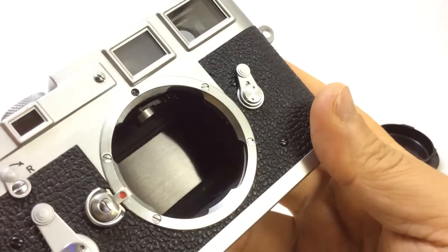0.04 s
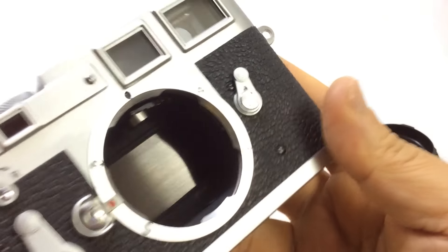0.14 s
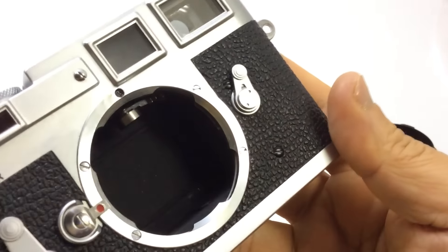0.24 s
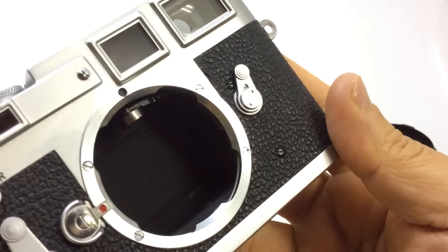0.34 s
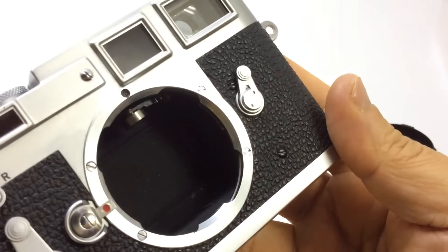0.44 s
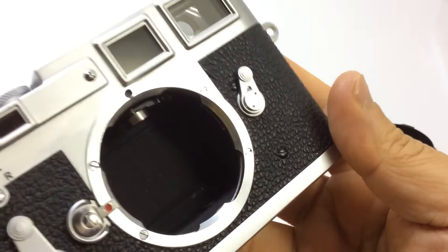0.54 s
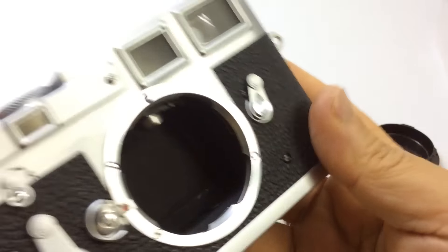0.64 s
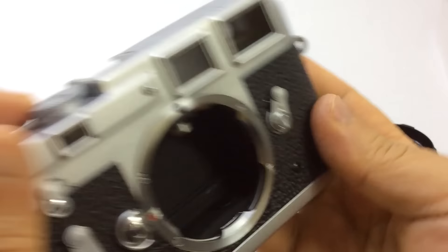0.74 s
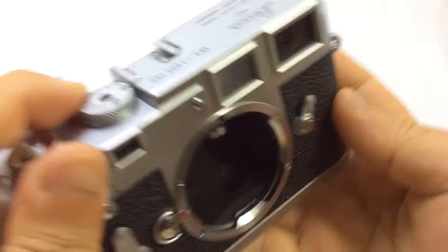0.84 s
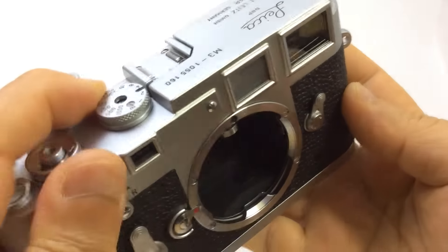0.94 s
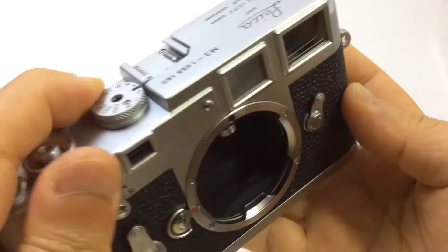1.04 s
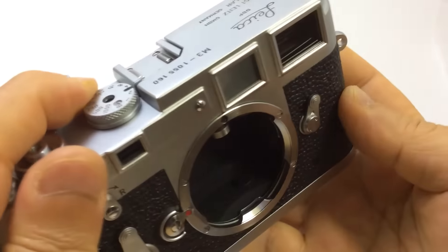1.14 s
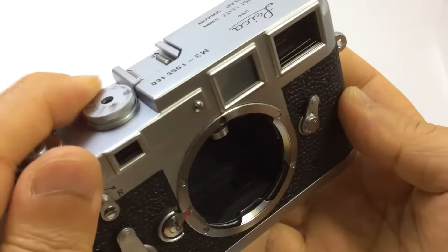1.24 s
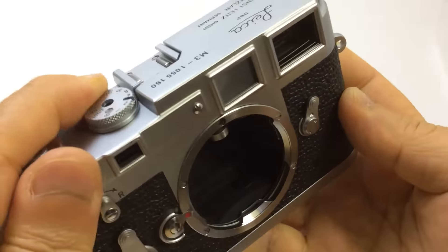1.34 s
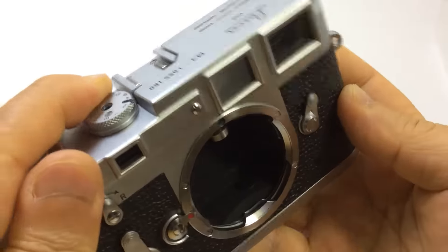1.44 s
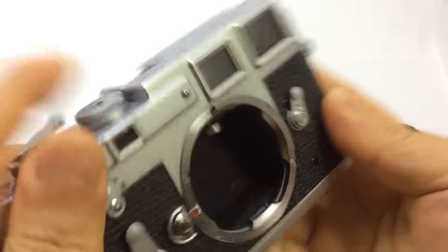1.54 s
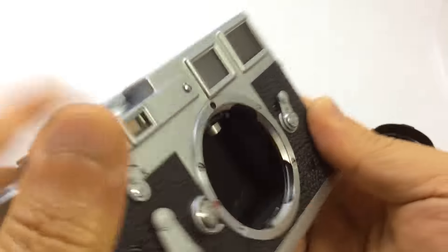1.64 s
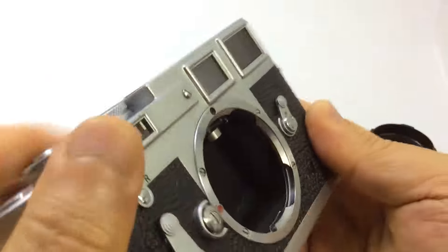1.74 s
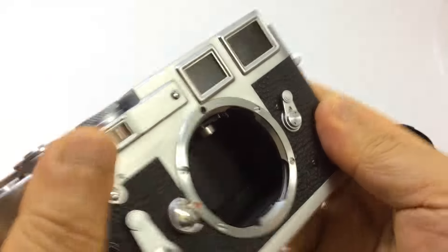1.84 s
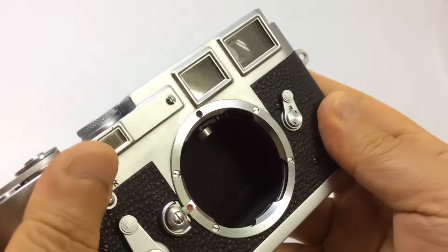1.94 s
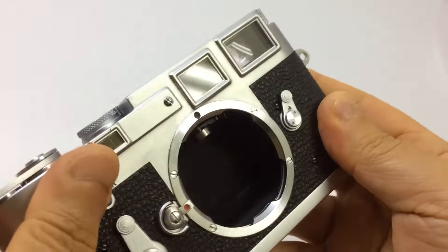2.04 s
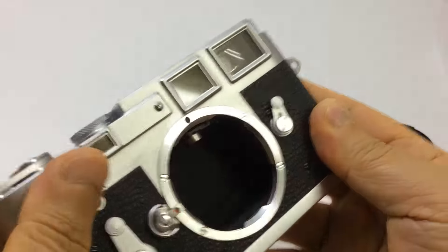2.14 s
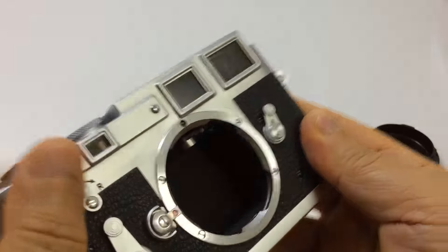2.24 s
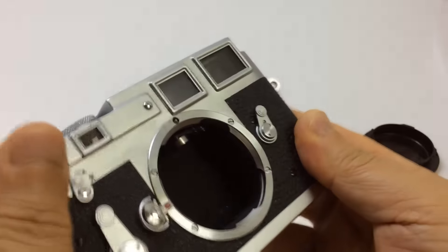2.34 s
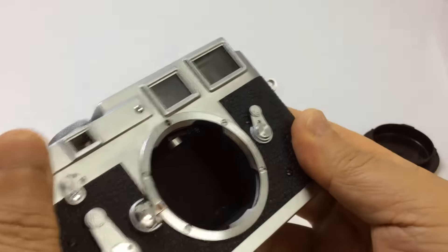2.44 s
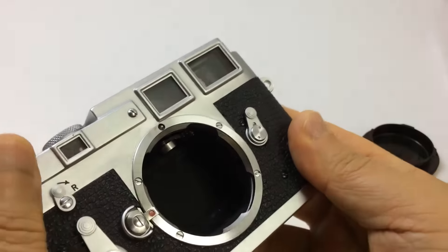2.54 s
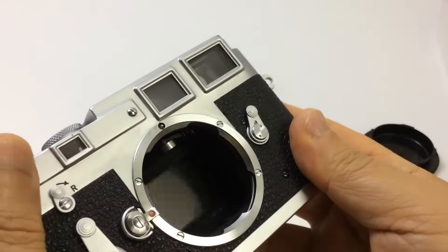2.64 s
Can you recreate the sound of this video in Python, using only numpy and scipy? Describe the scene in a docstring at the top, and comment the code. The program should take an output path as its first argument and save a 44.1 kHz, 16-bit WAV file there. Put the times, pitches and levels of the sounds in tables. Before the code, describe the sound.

Close by in a quiet, faintly humming workshop, a film camera's shutter gives a short buzz and a sharp snap. Faint rapid ticking and soft handling follow, then the winding lever clicks round, catches and springs back.

```python
"""A mechanical film camera, worked by hand, close by in a quiet workshop.
The slow-speed gear train whirrs until the shutter curtain snaps shut (0.24 s); the escapement runs
back, ticking faintly (0.4-0.9 s). Fingers shift. The advance lever is wound until it latches (2.1 s),
then ratchets home against its stop (2.4 s). Impacts are noise bursts shaped by each part's resonances.
Mains hum, a low drone and room air lie underneath throughout."""
import sys
import numpy as np
from scipy import signal
from scipy.fft import rfft, irfft, next_fast_len
from scipy.io import wavfile

SR = 44100
rng = np.random.default_rng(int(sys.argv[2]) if len(sys.argv) > 2 else 0)


def digitize_waveform(pressure):
    """Quantize a signal to 16-bit integers and store it at the path in sys.argv[1].

    Rows of a 2-D input are taken as channels; values are limited to [-1, 1].
    """
    field = np.atleast_2d(pressure).T
    bounded = np.clip(field, -1, 1)
    quanta = np.round(bounded * 32767).astype(np.int16)
    wavfile.write(sys.argv[1], SR, quanta)


N = 116865
T = np.arange(N) / SR


def shutter():
    """The curtain mechanism clicks, then snaps shut; the body rings."""
    # (time [s], 5 band levels [dB], t60 [s], room send [dB])
    hits = [ (.0920, -46.5, -38.5, -47, -43.5, -62, 0.025, -11),
            (.2155, -41.5, -40.5, -31, -26.5, -35, 0.02, -4.5),
            (.2255, -51, -44.5, -42, -37, -47, 0.031, -9),
            (.2379, -25.5, -34, -29, -16, -32.5, 0.059, -8.5),
            (.2391, -22, -18, -12, -13, -16.5, 0.031, -8), (.2420, -23, -13, -16.5, -16, -22.5, 0.018, -15)]
    # Body peaks and dips: (centre [Hz], width [Hz], gain [dB])
    peaks = [(544, 82, 8.5), (1096, 130, 4), (1673, 93, 14), (2030, 160, 6.5), (2681, 91, 4.5),
             (3070, 170, 6), (3720, 180, 8), (4200, 460, -6.5), (6250, 170, 7), (6820, 530, -7.5),
             (7700, 450, 2.5), (9030, 266, -0.5), (10670, 860, 9.5), (11830, 370, -9), (13300, 550, -10)]
    # Mode clusters: (centre [Hz], width [Hz], relative level [dB], t60 [s])
    rings = [(1666, 38, -32, .32)]
    return contacts(hits, peaks, rings)


def winding():
    """The advance lever clicks through its stroke and latches."""
    # (time [s], 5 band levels [dB], t60 [s], room send [dB])
    hits = [ (1.821, -48, -46, -41, -52, -65, 0.069, -30), (1.8328, -51, -56, -39.5, -39, -64, 0.033, -3),
            (1.8482, -39, -35.5, -28, -33, -36, 0.05, -9), (1.868, -42, -33, -32.5, -67, -51, 0.013, -7),
            (1.8725, -47, -41, -35, -43, -59, 0.038, -14), (1.891, -46, -44, -38, -72, -55, 0.049, 6),
            (1.9442, -50, -41, -32.5, -24, -34, 0.047, -9), (2.062, -55, -34.5, -44, -63, -62, .02, -5.5),
            (2.085, -57, -28.5, -27, -28, -55, 0.042, -1),
            (2.090, -47.5, -31, -26.5, -17.5, -30, 0.017, -2.5),
            (2.1068, -28.5, -19.5, -19.5, -18, -23, 0.049, -10.5)]
    # Winder peaks and dips: (centre [Hz], width [Hz], gain [dB])
    peaks = [(219, 190, -19), (388, 57, 4), (685, 52, 16.5), (885, 150, -19), (1950, 460, 6),
             (3180, 940, 4.5), (4900, 240, 4.5), (8030, 170, 5), (9300, 380, 5.5), (10400, 1050, 3),
             (12900, 520, -5)]
    # Mode clusters: (centre [Hz], width [Hz], relative level [dB], t60 [s])
    rings = [(701, 1.2, -12.5, 0.13), (3830, 180, -27, 0.28)]
    return contacts(hits, peaks, rings)


def lever_stop():
    """The returning lever strikes its stop and rings."""
    # (time [s], 5 band levels [dB], t60 [s], room send [dB])
    hits = [ (2.359, -46, -48, -48, -40, -50, 0.19, -9),
            (2.3663, -50.5, -25.5, -23.5, -28.5, -34, 0.03, -11)]
    # Lever peaks and dips: (centre [Hz], width [Hz], gain [dB])
    peaks = [(1320, 320, 8), (1750, 180, -7), (2190, 150, 8), (2600, 260, 5), (3770, 380, 14),
             (9100, 700, 4)]
    # Mode clusters: (centre [Hz], width [Hz], relative level [dB], t60 [s])
    rings = [(3830, 240, -20, 0.28)]
    return contacts(hits, peaks, rings)


def slow_speed_train():
    """Gears whirr while the shutter is open; the escapement then ticks back to rest."""
    # (time [s], level [dB])
    whirr_levels = [(0, -36.5), (.025, -45), (.06, -47), (.17, -46.5), (.235, -43.5), (.245, -84)]
    # Escapement: (time [s], tick rate [1/s], level [dB])
    run_back = [(.378, 97, -56.5), (.728, 92, -58), (0.741, 83, -56), (.918, 78.5, -58.5)]
    # Gear resonances: (centre [Hz], width [Hz], gain [dB])
    peaks = [(2560, 160, 10.5), (3470, 70, 5), (3590, 290, 6), (8150, 280, 6), (10450, 120, 3.5)]
    # Gear spectrum: (frequency [Hz], gain [dB])
    colour = [(300, -20.5), (700, -7), (1200, -8.5), (1900, -3), (3300, -0.5), (4600, -1.5), (5800, 2),
              (6700, -2.5), (8500, 1), (11000, 1), (13000, -6.5), (15000, -6)]
    s, ticks_per_s, db = np.transpose(run_back)
    times = [s[0]]
    while times[-1] < s[-1] - 1 / ticks_per_s[-1]:
        times.append(times[-1] + 1 / np.interp(times[-1], s, ticks_per_s))
    # Light ticks excite the resonances less.
    milder = [(hz, width_hz, .8 * gain_db) for hz, width_hz, gain_db in peaks]
    ticks = body(teeth(times, np.interp(times, s, db), t60_s=.04), milder)
    whirr = body(gear_run(whirr_levels, teeth_per_s=400, t60_s=.012), peaks)
    return coloured(whirr + ticks, colour)


def advance_gears():
    """Gears mesh on the forward stroke; the pawl slips over the teeth on the way back."""
    # (time [s], level [dB])
    stroke_levels = [(1.815, -64.5), (1.84, -63), (1.92, -49.5), (2.0, -50.5), (2.05, -57.5), (2.085, -45)]
    # (time [s], level [dB])
    pawl_clicks = [(2.256, -50.5), (2.267, -53), (2.279, -57), (2.2891, -51.5), (2.297, -49), (2.309, -67),
                   (2.324, -53), (2.335, -58), (2.346, -56)]
    # Gear and pawl spectrum: (frequency [Hz], gain [dB])
    colour = [(500, -8), (1500, 2.5), (3700, 9.5), (5200, 4.5), (9500, 5), (15000, -10.5)]
    ratchet = teeth(*np.transpose(pawl_clicks), t60_s=.053)
    stroke = gear_run(stroke_levels, teeth_per_s=79, t60_s=.018)
    return coloured(ratchet + stroke, colour)


def fingers():
    """Fingers knock lightly on the held body."""
    # (time [s], 5 band levels [dB], t60 [s], room send [dB])
    hits = [ (.957, -58, -51, -58, -86, -92, 0.16, 1), (1.312, -65, -54, -58.5, -62.5, -73, 0.18, -3),
            (1.387, -57.5, -43, -42, -51.5, -62.5, 0.028, -8.5),
            (1.599, -51, -51, -58.5, -73, -67, 0.058, 1.5), (1.630, -64, -58, -64.5, -66.5, -72, 0.31, -4),
            (1.745, -39, -48, -45.5, -56, -60, 0.023, -0.5), (1.798, -43, -41, -45.5, -49.5, -54, 0.023, 1)]
    # Body resonance: (centre [Hz], width [Hz], gain [dB])
    peaks = [(3660, 430, 5.9)]
    return contacts(hits, peaks, rings=[])


def grip():
    """Skin rubs dully on leather as the hands shift."""
    # (time [s], level [dB])
    levels = [(.3, -99), (.41, -72.5), (.53, -79), (.64, -69), (.82, -70), (1.0, -76.5)]
    rub = narrow_band(rng.standard_normal(N), hz=244, width_hz=120)
    return from_db(np.interp(T, *np.transpose(levels))) * rub / rub.std()


def contacts(hits, peaks, rings):
    """Each hit is a crack and a dense clatter through the part's resonances: (direct, room send)."""
    # Bands of the hit levels: (frequency [Hz])
    bands_hz = (550, 1600, 3800, 9500, 14500)
    crack_s, attack_s = .00033, .00029
    out, t = np.zeros((2, N)), T[:SR // 2]
    for s, *levels_db, t60_s, send_db in hits:
        envelope = fade(t, t60_s) + .6 * np.exp(-t / crack_s)
        hit = body(rng.standard_normal(len(t)) * envelope, peaks)
        for hz, width_hz, db, ring_t60_s in rings:
            hit += from_db(db) * fade(t, ring_t60_s) * mode_cluster(t, hz, width_hz)
        hit *= 1 - np.exp(-t / attack_s)
        bass = (169.5, levels_db[0] - 13)  # a small body radiates little bass
        hit = coloured(hit, [bass, *zip(bands_hz, levels_db)])
        add(out[0], s, hit)
        add(out[1], s, hit * from_db(send_db))
    return out


def mode_cluster(t, hz, width_hz):
    """Close modes as one tone with wandering phase."""
    wander = np.cumsum(rng.standard_normal(len(t))) * np.sqrt(2 * np.pi * width_hz / SR)
    return np.sin(2 * np.pi * (hz * t + rng.random()) + wander)


def gear_run(levels, teeth_per_s, t60_s):
    """Teeth mesh at a steady rate with slight jitter, under a level curve."""
    s, db = np.transpose(levels)
    times = np.arange(s[0], s[-1], 1 / teeth_per_s)
    times += rng.normal(0, .15, len(times)) / teeth_per_s
    return teeth(times, np.interp(times, s, db), t60_s)


def teeth(times, levels_db, t60_s, spread_db=2.17):
    """Tiny tooth impacts of uneven strength."""
    out, t = np.zeros(N), T[:SR // 20]
    for s, db in zip(times, levels_db):
        gain = from_db(db + spread_db * rng.standard_normal())
        add(out, s, gain * fade(t, t60_s) * rng.standard_normal(len(t)))
    return out


def body(x, peaks):
    """A part's peaks and dips in series."""
    for hz, width_hz, gain_db in peaks:
        x = x + (from_db(gain_db) - 1) * resonance(x, hz, width_hz)
    return x


def room(x, t60_s=.28, delay_s=.0061):
    """Diffuse reflections of a small room."""
    # Tail spectrum: (frequency [Hz], gain [dB])
    colour = [(200, -1.5), (1000, -2.5), (3500, -3.5), (10000, -2.5), (15000, -5)]
    t = T[:SR // 2]
    tail = rng.standard_normal(len(t)) * fade(t, t60_s) * (t > delay_s)
    return signal.fftconvolve(x, coloured(tail / np.linalg.norm(tail), colour))[:N]


def workshop(drone_hz=53):
    """Mains hum, a wavering low drone and still air."""
    # (frequency [Hz], RMS level [dB])
    mains = [(120, -60), (240, -75), (360.5, -78.5)]
    # (time [s], level [dB])
    drone_levels = [(0, -65), (.75, -58.5), (1.45, -65.5), (1.85, -62.5), (2.15, -69), (2.65, -64.5)]
    # (frequency [Hz], gain [dB])
    air_colour = [(20, -64.5), (45, -55.5), (85, -44), (170, -48), (300, -56.5), (520, -61), (850, -55),
                  (1400, -58), (2400, -74), (6000, -77.5), (9000, -72.5), (12000, -81), (15500, -87)]
    hum = sum(np.sqrt(2) * from_db(db) * np.sin(2 * np.pi * (hz * T + rng.random())) for hz, db in mains)
    waver = narrow_band(rng.standard_normal(N + SR), drone_hz, width_hz=8.4)[SR:]  # 1 s to settle
    drone = np.sqrt(2) * np.sin(2 * np.pi * drone_hz * T) + .29 * waver / waver.std()
    drone *= from_db(np.interp(T, *np.transpose(drone_levels)))
    return hum + drone + coloured(rng.standard_normal(N), air_colour)


def resonance(x, hz, width_hz):
    """Two-pole band-pass, unity peak gain."""
    r = np.exp(-np.pi * width_hz / SR)
    feedback = [1, -2 * r * np.cos(2 * np.pi * hz / SR), r * r]
    return signal.lfilter(np.array([1, 0, -1]) * (1 - r * r) / 2, feedback, x)


def narrow_band(x, hz, width_hz):
    """Two equal resonances in series."""
    return resonance(resonance(x, hz, width_hz), hz, width_hz)


def coloured(x, points):
    """Minimum-phase filter through (frequency [Hz], gain [dB]) points."""
    size = 2 * next_fast_len(len(x))
    hz, db = np.transpose(points)
    grid_hz = np.maximum(np.arange(size // 2 + 1) * SR / size, 1)
    gain = from_db(np.interp(np.log(grid_hz), np.log(hz), db))
    cepstrum = irfft(np.log(gain))
    cepstrum[1:size // 2] *= 2  # fold onto the causal half
    cepstrum[size // 2 + 1:] = 0
    return irfft(rfft(x, size) * np.exp(rfft(cepstrum)))[:len(x)]


def from_db(db):
    """Decibels to gain."""
    return 10 ** (np.asarray(db) / 20)


def fade(t, t60_s):
    """Exponential decay, 60 dB in t60_s."""
    return np.exp(-np.log(1000) * t / t60_s)


def add(track, s, sound):
    """Mix a sound into a track at time s."""
    start = max(int(s * SR), 0)
    track[start:start + len(sound)] += sound[:N - start]


def scene():
    """The camera and its reflections over the workshop background, mono."""
    background = workshop()
    direct, send = shutter() + fingers() + winding() + lever_stop()
    gears = slow_speed_train() + advance_gears()
    reflections = room(send + from_db(-1.5) * gears)
    return (direct + gears + reflections + grip() + background)[None]


def record(dry):
    """Steep low-pass."""
    cutoff_hz = 15200
    return signal.sosfilt(signal.ellip(10, .3, 70, cutoff_hz, fs=SR, output="sos"), dry)


dry = scene()
out = record(dry)
digitize_waveform(out)
```